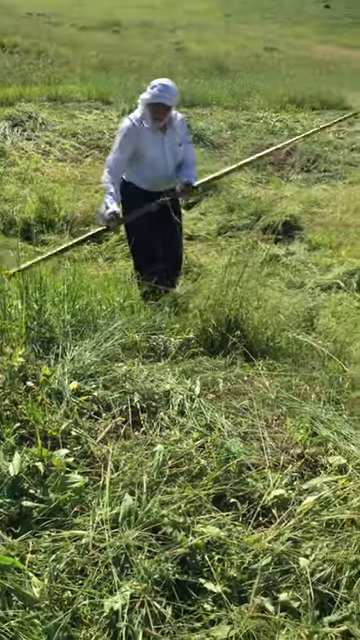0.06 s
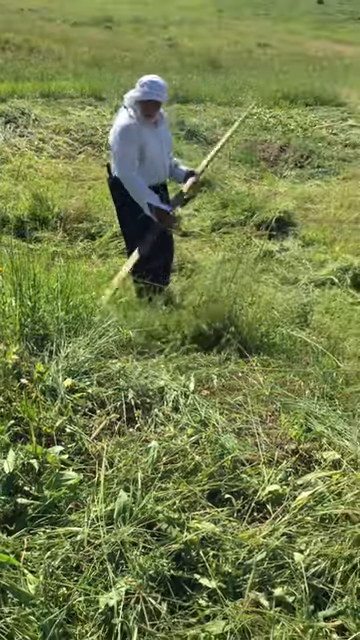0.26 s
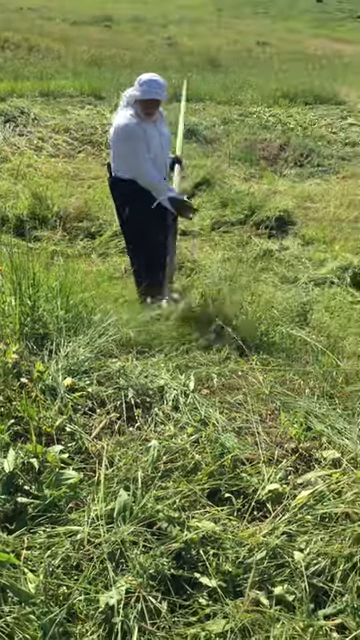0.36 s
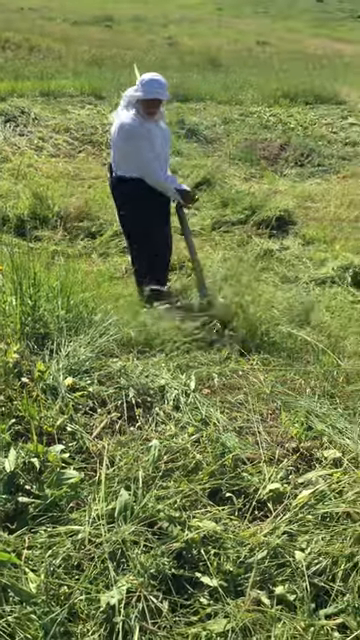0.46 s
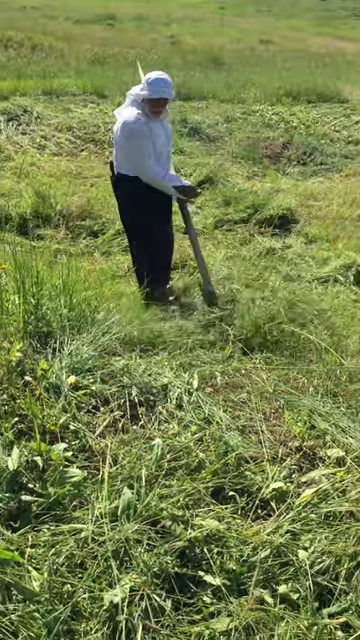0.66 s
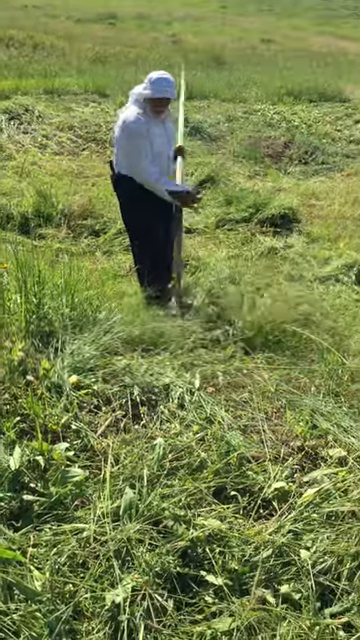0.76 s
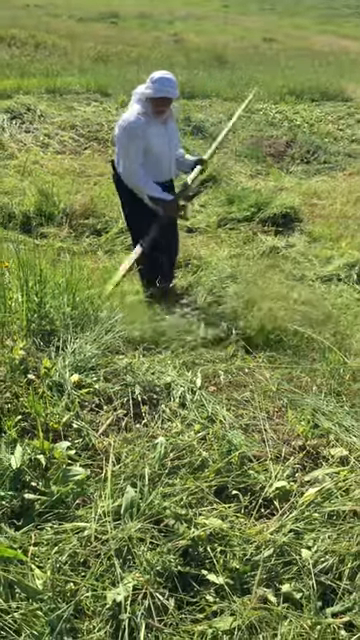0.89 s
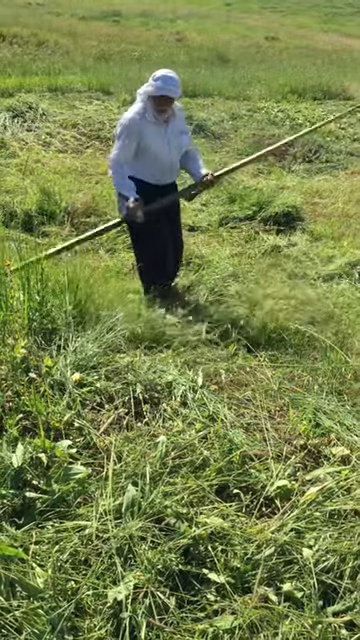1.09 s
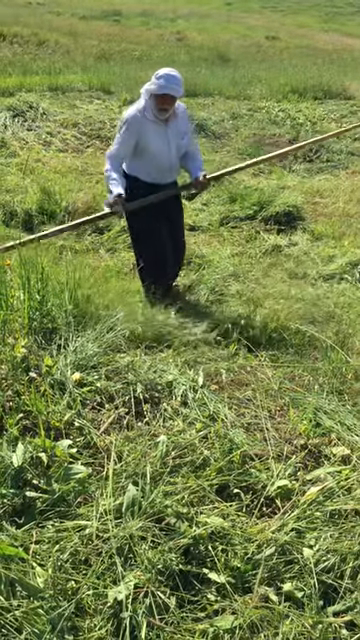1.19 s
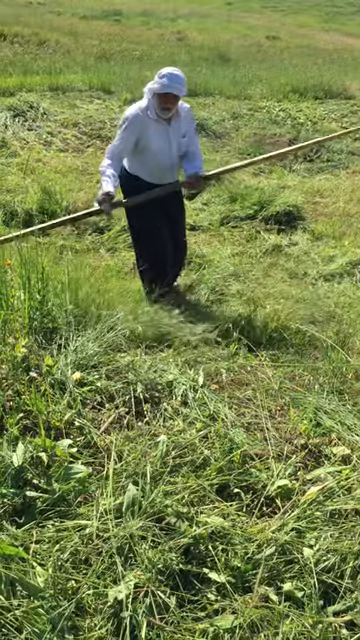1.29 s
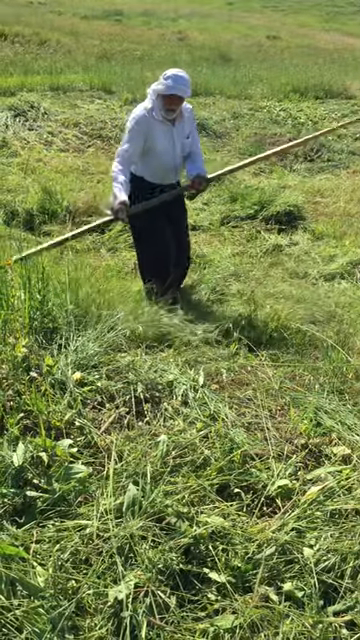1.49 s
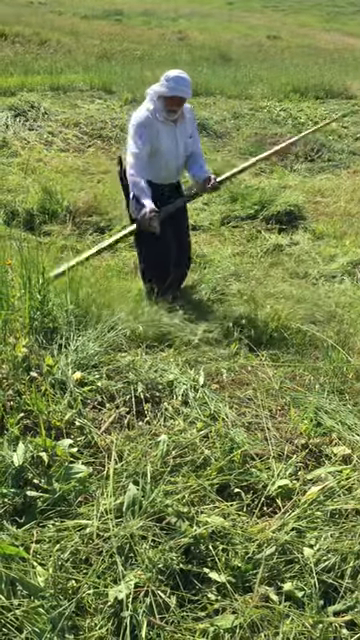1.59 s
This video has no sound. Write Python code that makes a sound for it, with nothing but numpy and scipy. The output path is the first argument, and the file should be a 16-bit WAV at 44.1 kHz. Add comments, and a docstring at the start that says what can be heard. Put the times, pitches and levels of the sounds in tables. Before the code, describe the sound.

One scythe stroke cuts through meadow grass over buzzing crickets and faint birds.

```python
"""One scythe stroke in a meadow. A bush cricket buzzes throughout, a field cricket chirps, small birds call.
From 0.2 s the edge enters the grass: leaves rustle, stalks snap against the thin steel and make it ring.
Near 0.5 s the blade's heel slides over stubble, with a soft footfall and a puff of air on the microphone.
From 0.8 s the return swing brushes softly back, single stems ticking against the blade."""
import sys
import numpy as np
from scipy import signal
from scipy.fft import rfft, irfft, next_fast_len
from scipy.io import wavfile
from scipy.ndimage import uniform_filter1d

SR = 44100
rng = np.random.default_rng(int(sys.argv[2]) if len(sys.argv) > 2 else 0)


def materialize(psi):
    """Save the field psi as 16-bit PCM at rate SR to the path in sys.argv[1].

    A 1-D psi becomes a single channel; in a 2-D psi each row is a channel.
    """
    bounded = np.clip(np.atleast_2d(psi).T, -1, 1)
    quanta = np.round(bounded * 32767).astype(np.int16)
    wavfile.write(sys.argv[1], SR, quanta)


N = 72765

# stalk crunch spectrum: freq_hz, gain_db
CRUNCH_SPECTRUM = [(60, -28), (140, -10), (450, -8), (900, 0), (1500, -2), (2100, 3), (2800, -10),
                   (6000, -34.5)]
# leaf rustle and crack spectrum: freq_hz, gain_db
GRASS_SPECTRUM = [(100, -15), (600, -12), (2000, -7), (3200, -1), (4900, -3), (6300, 2), (8500, -1),
                  (10400, -4.5), (12200, 2.5), (14000, -2), (16000, -1)]


def undb(db):
    return 10 ** (np.asarray(db) / 20)


def unit_rms(x):
    return x / np.sqrt(np.mean(x ** 2))


def time_s():
    return np.arange(N) / SR


def envelope(points):
    """Gain along (time_s, level_db) points, silent outside them."""
    return undb(np.interp(time_s(), *np.array(points).T, left=-120, right=-120))


def swell(centre_s, sigma_s):
    """Gaussian envelope, peak 1."""
    return np.exp(-.5 * ((time_s() - centre_s) / sigma_s) ** 2)


def colour(x, spectrum):
    """Minimum-phase filter through (freq_hz, gain_db) points, unit power gain."""
    size = 2 * next_fast_len(N)
    hz, db = np.array(spectrum).T
    bins_hz = np.maximum(np.fft.rfftfreq(size, 1 / SR), 1)
    gain = unit_rms(undb(np.interp(np.log(bins_hz), np.log(hz), db)))
    cepstrum = irfft(np.log(gain))
    cepstrum[1:size // 2] *= 2
    cepstrum[size // 2 + 1:] = 0
    return irfft(rfft(x, size) * np.exp(rfft(cepstrum)))[:N]


def noise(spectrum):
    """Coloured noise, rms 1."""
    return unit_rms(colour(rng.standard_normal(N), spectrum))


def ring(x, modes):
    """Parallel resonators (freq_hz, width_hz, gain_db), about unit power gain."""
    out = sum(undb(db) * signal.lfilter(*signal.iirpeak(hz, hz / width_hz, fs=SR), x)
              for hz, width_hz, db in modes)
    return out / np.sqrt(sum(undb(db) ** 2 * np.pi * width_hz / SR for _, width_hz, db in modes))


def snaps(rate_per_s, spread_db):
    """Train of tiny fractures, a few much stronger than the rest; rms 1."""
    size = undb(spread_db * np.minimum(rng.exponential(size=N), 5))
    return unit_rms((rng.random(N) < rate_per_s / SR) * size * rng.choice([-1, 1], N))


def blade(force):
    """Thin steel answers a force with ringing modes and a short crunch."""
    # steel modes: freq_hz, width_hz, gain_db
    modes = [(337, 68, -13), (558, 7, -21), (663, 28, -0.5), (926, 19, 0), (1003, 49, -4.5),
             (1128, 90, 0.5), (1213, 25, -0.5), (1290, 42, 3), (1350, 48, 0.5), (1490, 21, -3.5),
             (1672, 43, -0.5), (1845, 32, -1), (1855, 16, -22), (2160, 22, 1)]
    return ring(force, modes) + undb(-8) * colour(force, CRUNCH_SPECTRUM)


def cut():
    """The edge tears through stalks; thick ones crack and strike the blade."""
    # tearing level: time_s, level_db
    tearing = [(.19, -89), (.27, -59), (.31, -53), (.36, -40), (.387, -41.5), (.42, -36.5), (.445, -46.5),
               (.51, -46.5), (.56, -65), (.6, -64), (.72, -78), (.8, -81)]
    # thick stalks: time_s, level_db, blade_share
    stalks = [(0.3705, -38, 0.5), (.381, -34.5, 0.64), (.386, -27, 0.67), (0.392, -35, 0.93),
              (.415, -46, 0.04), (0.419, -39.5, 0.87), (0.449, -32, 0.3), (0.514, -42, 0.53),
              (1.06, -53, 0)]
    crush_sigma_s, crack_decay_s = 0.0019, 0.00076
    t = time_s()
    out = unit_rms(blade(snaps(rate_per_s=2200, spread_db=2.5))) * envelope(tearing)
    for at_s, db, blade_share in stalks:
        blow = blade(rng.standard_normal(N) * swell(at_s, crush_sigma_s))
        blow /= np.sqrt(uniform_filter1d(blow ** 2, size=256).max())  # peak short-term rms 1
        crack = noise(GRASS_SPECTRUM) * (t >= at_s) * np.exp(-np.abs(t - at_s) / crack_decay_s)
        out += undb(db) * (blade_share * blow + (1 - blade_share) * crack)
    return out


def heel():
    """The blade's heel resonates as it slides over stubble."""
    # heel resonances: freq_hz, width_hz, gain_db
    modes = [(613, 120, -1), (777, 100, 0.5), (1708, 64, 5)]
    ringing = unit_rms(ring(snaps(rate_per_s=2200, spread_db=2.5), modes))
    crunch = undb(-9) * noise(CRUNCH_SPECTRUM)
    return undb(-45) * (ringing + crunch) * swell(centre_s=0.4993, sigma_s=0.048)


def rustle():
    """Leaves brush along the blade, going out and coming back."""
    # stroke rustle: time_s, level_db
    stroke_level = [(.15, -66), (.21, -55), (.28, -43), (.36, -43), (.43, -37), (.51, -38.5), (.58, -45.5),
                    (.66, -50), (.8, -64)]
    # return rustle: time_s, level_db
    return_level = [(.8, -65), (.93, -57.5), (1.0, -52), (1.11, -48.5), (1.19, -51.5), (1.33, -60.5),
                    (1.58, -64), (1.65, -57)]
    # brushed stubble spectrum: freq_hz, gain_db
    stubble_spectrum = [(150, -33), (500, -9), (1100, -5.5), (2200, -3), (3500, -3.5), (5500, -2),
                        (7000, 5), (10400, -2), (12500, 3.5), (16000, -2)]
    leaves = colour(snaps(rate_per_s=9000, spread_db=2.5), GRASS_SPECTRUM)
    stubble = colour(snaps(rate_per_s=5000, spread_db=1.5), stubble_spectrum)
    return leaves * envelope(stroke_level) + stubble * envelope(return_level)


def edge_scrape():
    """The edge scrapes thinly on entering the grass."""
    # edge resonances: freq_hz, width_hz, gain_db
    modes = [(840, 45, -26), (1750, 200, -1.5), (2850, 320, 0), (6170, 140, 8)]
    scrape = unit_rms(ring(rng.standard_normal(N), modes))
    return undb(-50) * scrape * swell(centre_s=0.25, sigma_s=0.027)


def stem_ticks():
    """Single stems scrape the blade, each a narrow-band burst."""
    # stem contacts: centre_s, sigma_s, freq_hz, level_db
    stems = [(.27, 0.0071, 825, -58.5), (.273, 0.013, 2860, -52.5), (0.332, 0.017, 1820, -46),
             (.352, 0.0065, 2000, -43), (.543, 0.0069, 1780, -45.5), (0.843, 0.019, 790, -70),
             (1.013, 0.029, 825, -72), (1.075, 0.0066, 950, -61), (1.096, 0.019, 1980, -62.5),
             (1.166, 0.01, 2200, -60.5)]
    width_hz = 200
    return sum(undb(db) * ring(rng.standard_normal(N), [(hz, width_hz, 0)]) * swell(at_s, sigma_s)
               for at_s, sigma_s, hz, db in stems)


def footfalls():
    """Dull thuds on cut grass as the mower shifts weight."""
    # steps: centre_s, sigma_s, level_db
    steps = [(0.317, 0.018, -63), (0.495, 0.022, -56.5), (0.722, 0.0074, -69.5), (1.005, 0.0075, -81)]
    # turf thud spectrum: freq_hz, gain_db
    turf = [(40, -22), (150, -3), (270, 0.5), (600, -32), (2000, -40)]
    return noise(turf) * sum(undb(db) * swell(at_s, sigma_s) for at_s, sigma_s, db in steps)


def bush_cricket():
    """Strong and weak strokes ring the wing in turn, over the throbbing hiss of others farther off."""
    # wing resonances within a stroke: freq_hz, scatter_hz, delay_s, gain_db
    wing_modes = [(12300, 2700, -0.0008, -7), (9460, 150, -0.001, -0.5), (8470, 350, .0006, -1.5),
                  (7016, 290, .0009, -3)]
    # distant chorus spectrum: freq_hz, gain_db
    chorus_spectrum = [(3500, -32), (5600, -19), (6700, -5.5), (7700, -3.5), (9200, 0), (10400, -6),
                       (12800, -9), (14200, -12), (16000, -20)]
    # drift of the whole buzz: time_s, gain_db
    drift = [(0, -0.5), (.06, -1.5), (.085, -3.5), (.17, -3), (.25, 1), (.9, -0.5), (1.4, -1), (1.65, -1.5)]
    cycle_hz, throb_hz, throb_depth = 49.15, 73.5, 0.24
    start_s, jitter_s, pulse_sigma_s = 0.0029, 0.0005, 0.00093
    weak_db, spread_db = -5, 1.2
    t = time_s() - start_s
    stroke = np.round(2 * cycle_hz * t).astype(int)  # two strokes per cycle
    timing, strength, *detunes = rng.standard_normal((stroke[-1] + 1, 2 + len(wing_modes)))[stroke].T
    since_s = t - stroke / (2 * cycle_hz) - jitter_s * timing
    stroke_gain = undb(weak_db * (stroke % 2) + spread_db * strength)
    wing = 0
    for (hz, scatter_hz, delay_s, db), detune in zip(wing_modes, detunes):
        tone = np.sin(2 * np.pi * np.cumsum(hz + scatter_hz * detune) / SR)
        wing += undb(db) * tone * np.exp(-.5 * ((since_s - delay_s) / pulse_sigma_s) ** 2)
    throb = unit_rms(ring(rng.standard_normal(N), [(throb_hz, throb_hz, 0)]))
    chorus = unit_rms(noise(chorus_spectrum) * np.exp(throb_depth * throb))
    return (undb(-54.5) * unit_rms(stroke_gain * wing) + undb(-52.5) * chorus) * envelope(drift)


def whistle(start_s, length_s, centre_hz, rise_hz, trill_depth, trill_hz=95):
    """Near-pure gliding note; the trill moves pitch and level together."""
    since_s = time_s() - start_s
    progress = np.clip(since_s / length_s, 0, 1)
    flutter = trill_depth * np.sin(2 * np.pi * trill_hz * since_s)
    pitch_hz = centre_hz + rise_hz * (progress - .5) + 150 * flutter
    arch = np.abs(np.sin(np.pi * progress)) ** 0.44
    return np.sqrt(2) * arch * (1 + flutter) * np.sin(2 * np.pi * np.cumsum(pitch_hz) / SR)


def field_cricket():
    """Short falling syllables in twos and threes; a second, higher cricket is fainter."""
    # chirp syllables: centre_s, pitch_hz, level_db
    syllables = [(0.148, 4870, -65), (0.178, 4890, -62.5), (0.211, 4880, -56.5), (.679, 4900, -64),
                 (.709, 4890, -64), (.748, 4900, -63.5), (.947, 4900, -65), (.969, 5400, -64),
                 (.977, 4920, -63), (1.011, 4920, -62), (1.242, 4900, -61.5), (1.277, 4920, -59.5),
                 (1.484, 4820, -62.5), (1.516, 4870, -59.5), (1.554, 4870, -59), (1.575, 5300, -66)]
    length_s, sag_hz_per_s = 0.015, 6900
    rise_hz = -sag_hz_per_s * length_s
    return sum(undb(db) * whistle(at_s - length_s / 2, length_s, hz, rise_hz, trill_depth=0)
               for at_s, hz, db in syllables)


def birds():
    """Whistled notes and two raspy double chips."""
    # whistles: start_s, length_s, pitch_hz, rise_hz, level_db, trill_depth
    notes = [(0.058, 0.096, 3422, 65, -56, 0.27), (.632, 0.057, 2604, 0, -58.5, 0.3),
             (0.727, 0.062, 2250, -70, -65.5, 0.57), (0.915, 0.026, 1744, 0, -64, 0.36),
             (0.938, 0.023, 1130, 3.5, -62, 0.05)]
    # chips: centre_s, level_db
    chips = [(0.829, -64), (.843, -65), (0.869, -61), (0.883, -57.5)]
    chip_hz, chip_width_hz = 3930, 670
    song = sum(undb(db) * whistle(start_s, length_s, hz, rise_hz, trill_depth)
               for start_s, length_s, hz, rise_hz, db, trill_depth in notes)
    throat = [(chip_hz, chip_width_hz, 0)]
    rasp = unit_rms(ring(ring(rng.standard_normal(N), throat), throat))
    return song + rasp * sum(undb(db) * swell(at_s, sigma_s=0.0036) for at_s, db in chips)


def meadow_scatter(call, decay_s=0.024, tail_db=-9):
    """The meadow scatters a faint tail behind a distant call."""
    tail = rng.standard_normal(N) * np.exp(-time_s() / decay_s)
    return call + undb(tail_db) * signal.fftconvolve(call, tail / np.linalg.norm(tail))[:N]


def air():
    """Open-field hush and soft low puffs of wind on the microphone."""
    # hush spectrum: freq_hz, gain_db
    hush_spectrum = [(20, -3), (45, -3), (90, 1.5), (200, 0.5), (400, -5), (1200, -8), (2500, -10),
                     (5000, -15.5), (16000, -14)]
    # puff spectrum: freq_hz, gain_db
    puff_spectrum = [(15, -20), (45, 6), (80, 0), (160, -19), (600, -74)]
    # wind puffs: centre_s, sigma_s, level_db
    puffs = [(0.484, 0.017, -59), (0.67, 0.023, -66), (.735, 0.028, -75), (1.0, 0.021, -72),
             (1.306, .025, -69.5), (1.445, 0.011, -69)]
    puff_gain = sum(undb(db) * swell(at_s, sigma_s) for at_s, sigma_s, db in puffs)
    return undb(-68.5) * noise(hush_spectrum) + noise(puff_spectrum) * puff_gain


def scene():
    """Mower, insects, birds and air, mono."""
    mower = cut() + heel() + rustle() + edge_scrape() + stem_ticks() + footfalls()
    meadow = bush_cricket() + meadow_scatter(field_cricket() + birds()) + air()
    return (mower + meadow)[None]


def record(dry):
    """Steep elliptic low-pass."""
    cutoff_hz = 15680
    return signal.sosfilt(signal.ellip(12, .1, 80, cutoff_hz, fs=SR, output="sos"), dry)


dry = scene()
out = record(dry)
materialize(out)
```